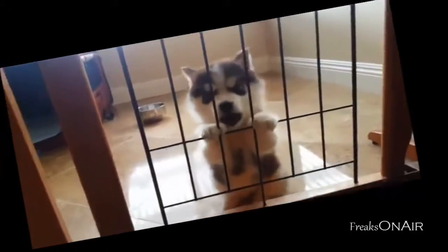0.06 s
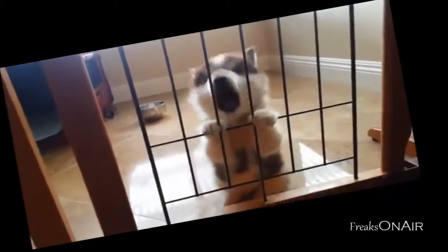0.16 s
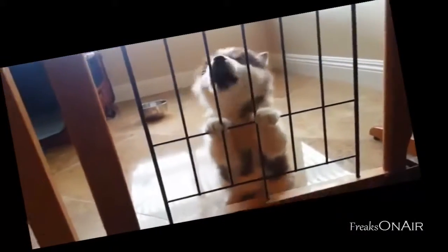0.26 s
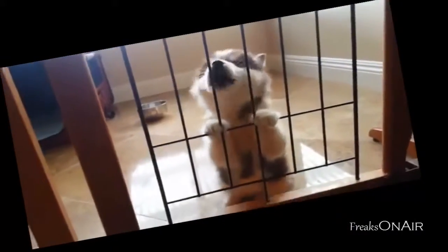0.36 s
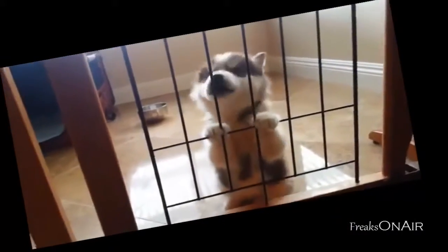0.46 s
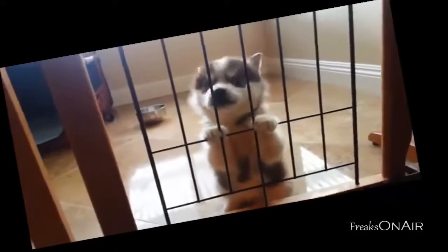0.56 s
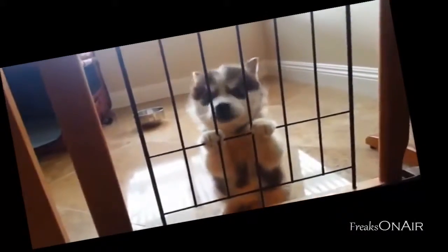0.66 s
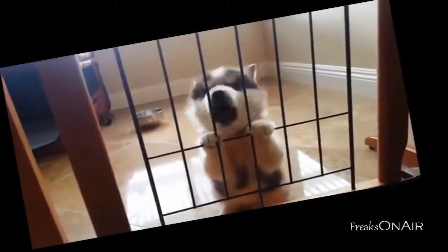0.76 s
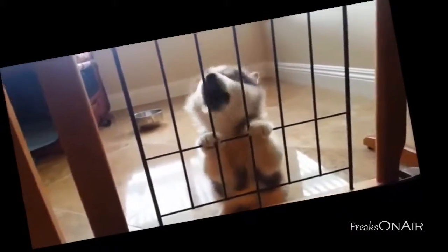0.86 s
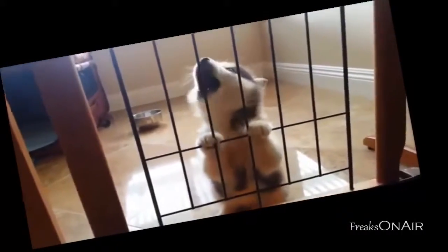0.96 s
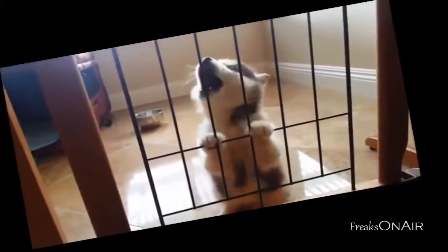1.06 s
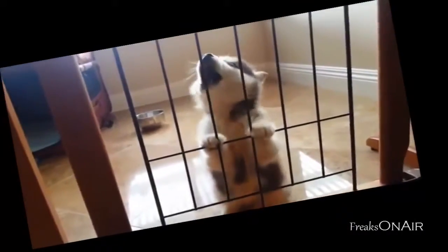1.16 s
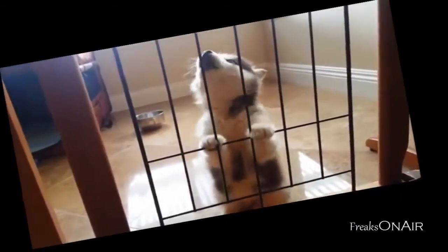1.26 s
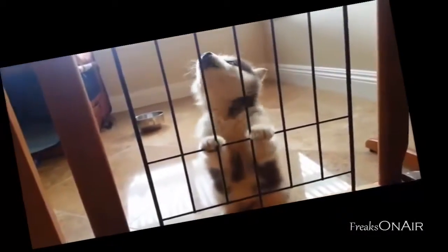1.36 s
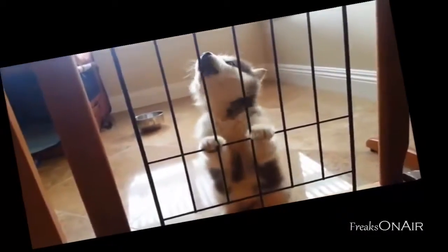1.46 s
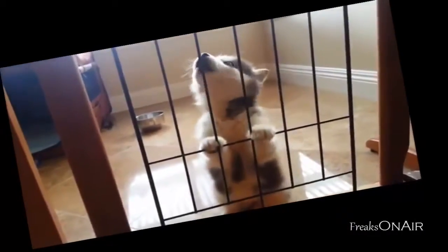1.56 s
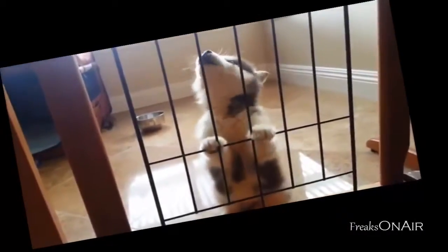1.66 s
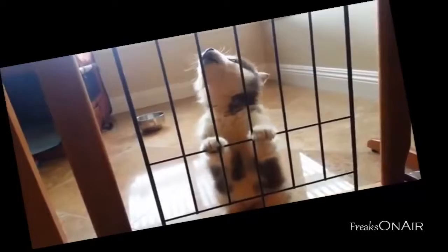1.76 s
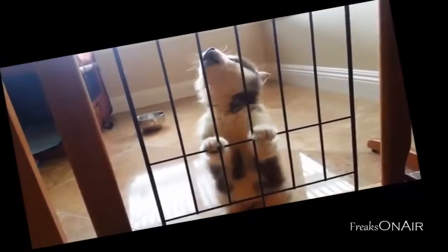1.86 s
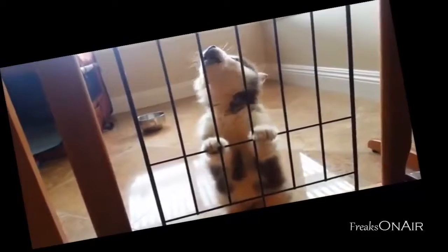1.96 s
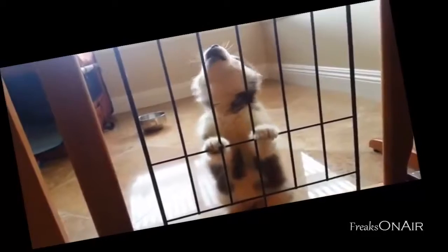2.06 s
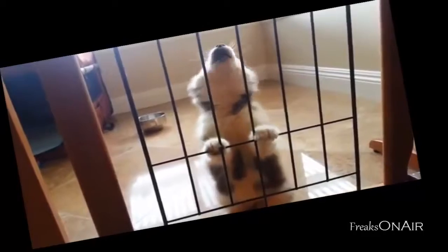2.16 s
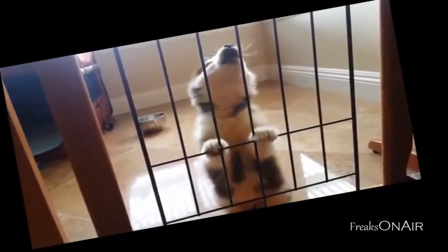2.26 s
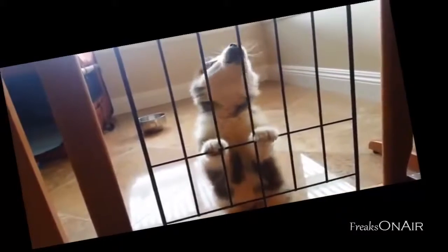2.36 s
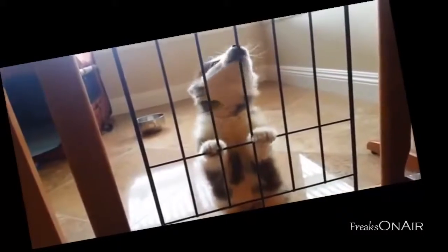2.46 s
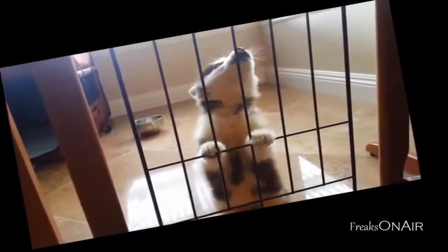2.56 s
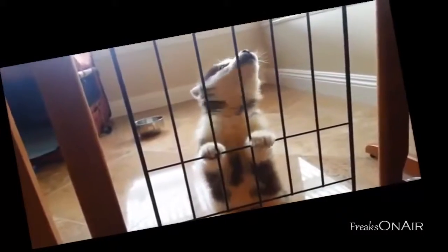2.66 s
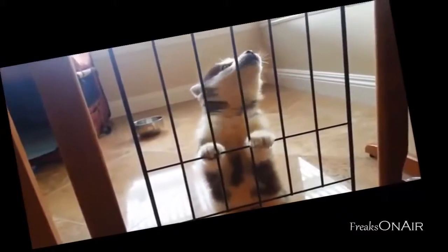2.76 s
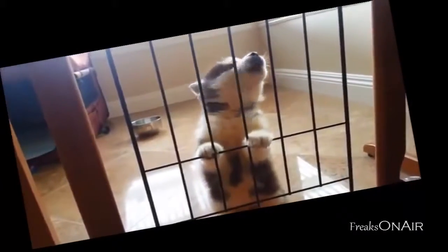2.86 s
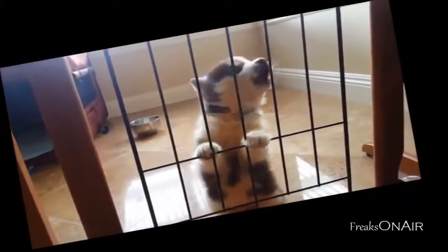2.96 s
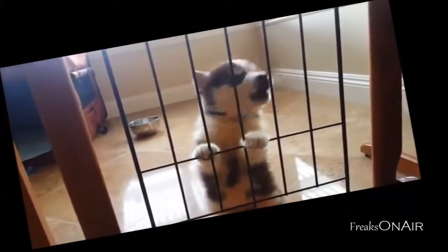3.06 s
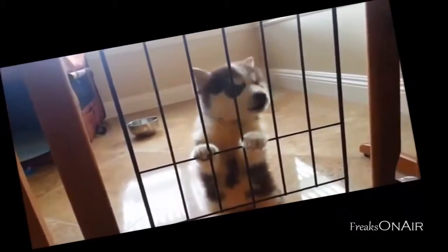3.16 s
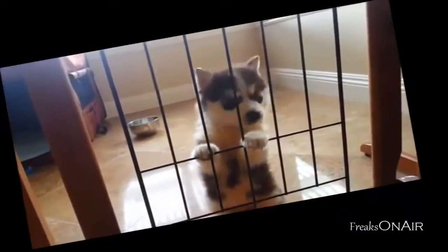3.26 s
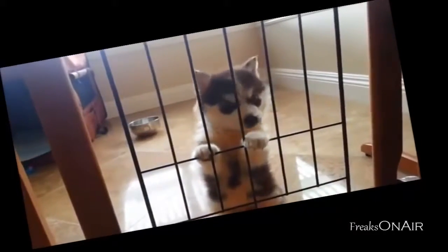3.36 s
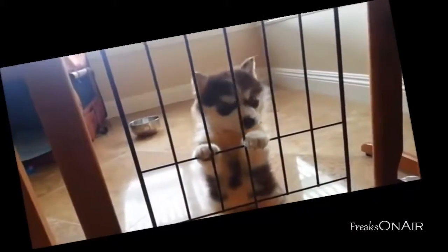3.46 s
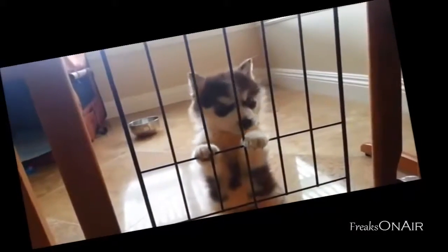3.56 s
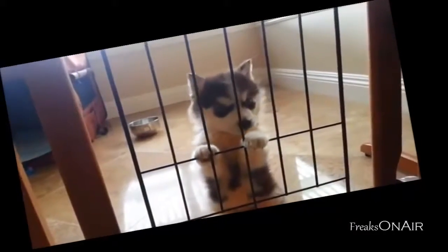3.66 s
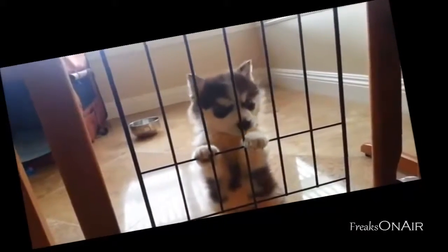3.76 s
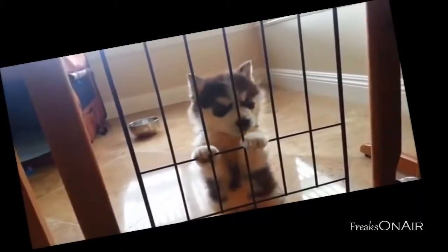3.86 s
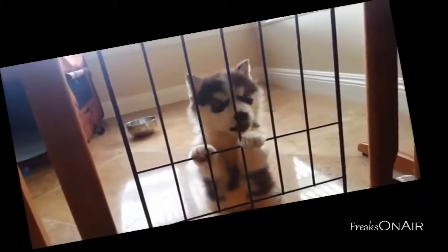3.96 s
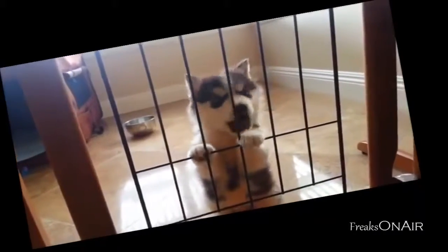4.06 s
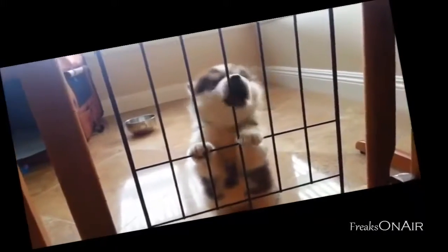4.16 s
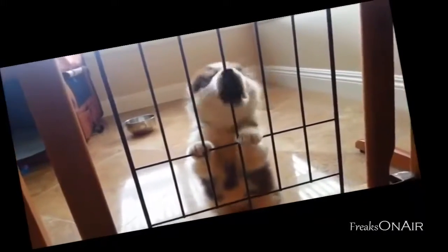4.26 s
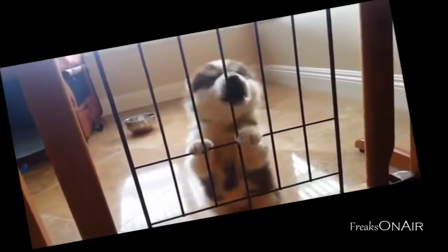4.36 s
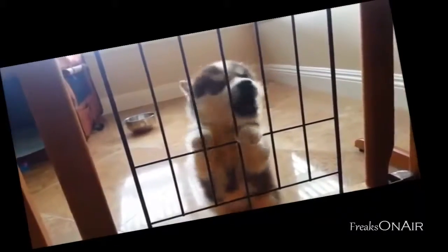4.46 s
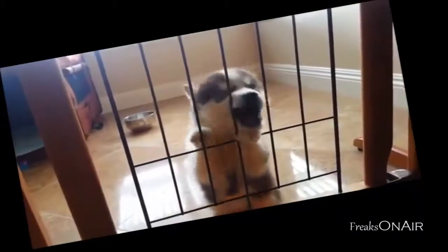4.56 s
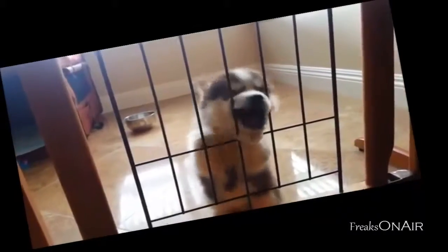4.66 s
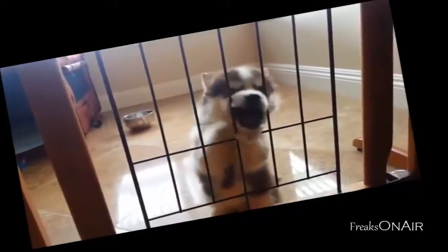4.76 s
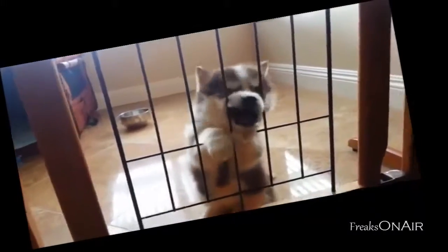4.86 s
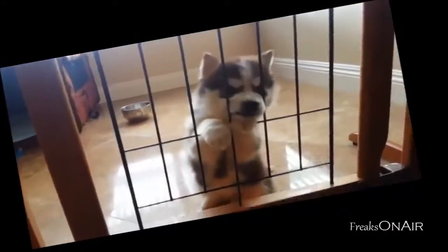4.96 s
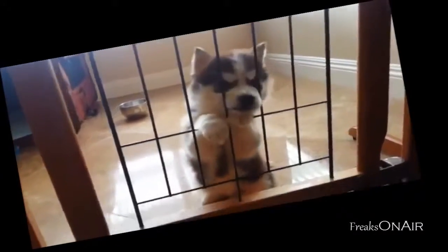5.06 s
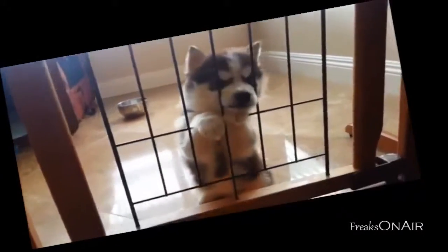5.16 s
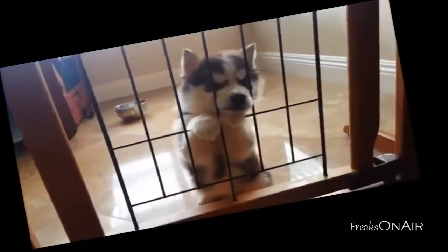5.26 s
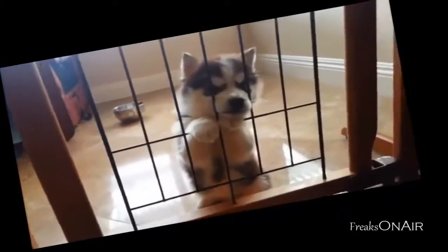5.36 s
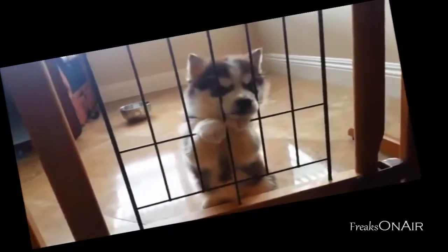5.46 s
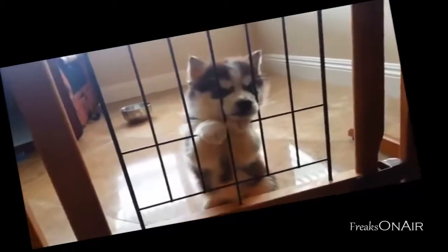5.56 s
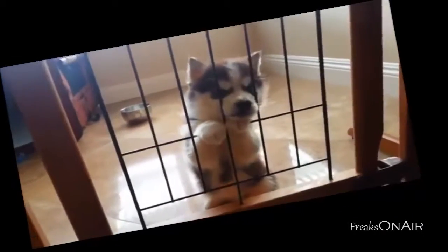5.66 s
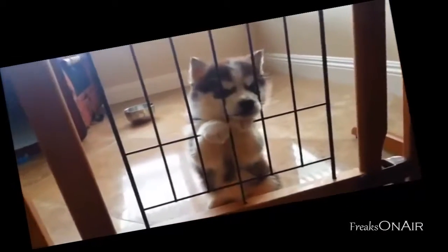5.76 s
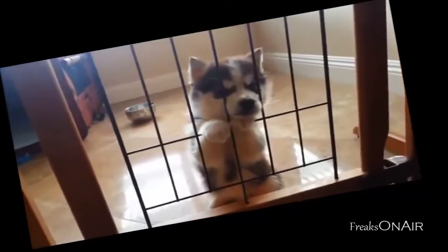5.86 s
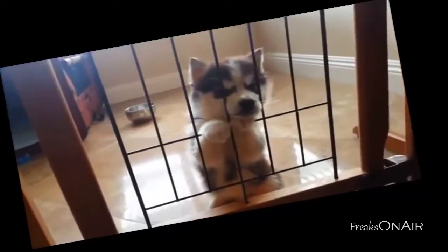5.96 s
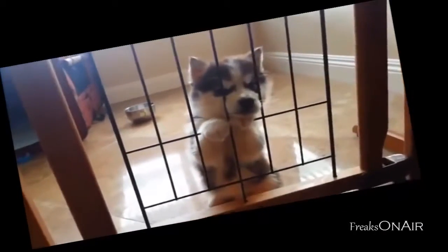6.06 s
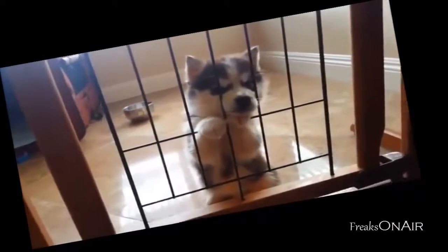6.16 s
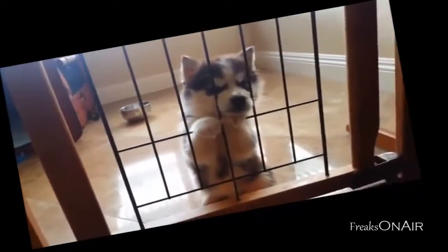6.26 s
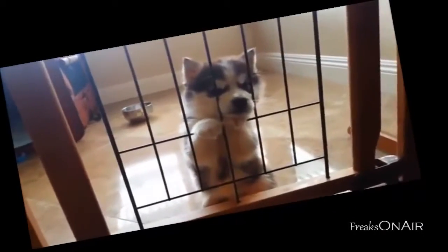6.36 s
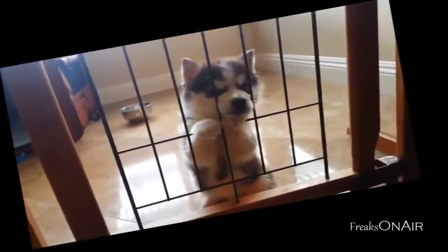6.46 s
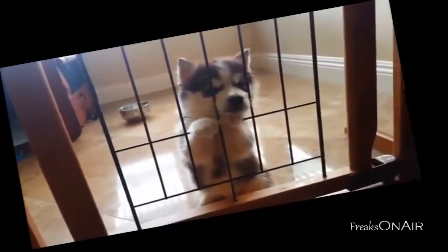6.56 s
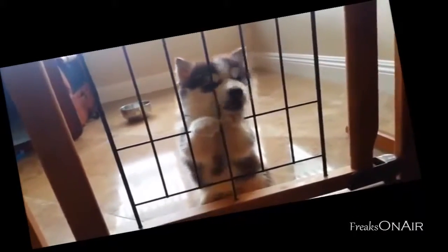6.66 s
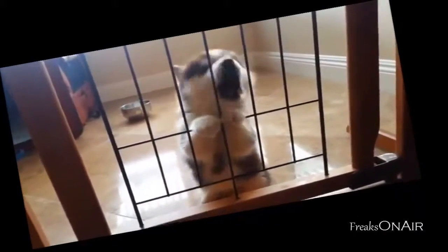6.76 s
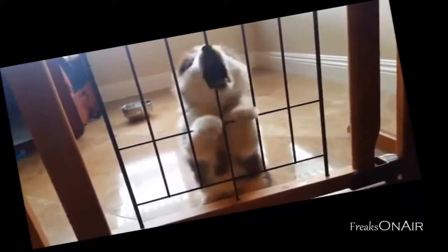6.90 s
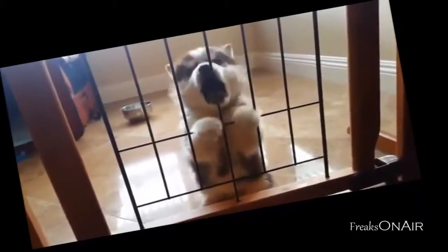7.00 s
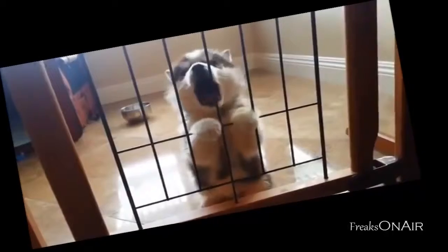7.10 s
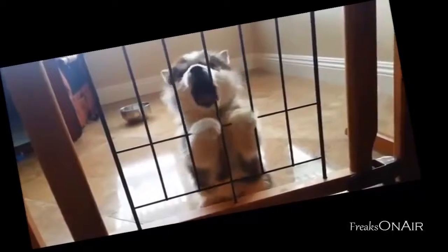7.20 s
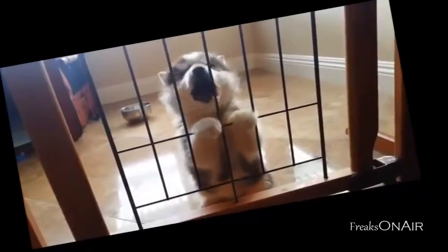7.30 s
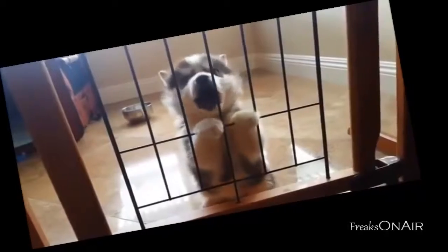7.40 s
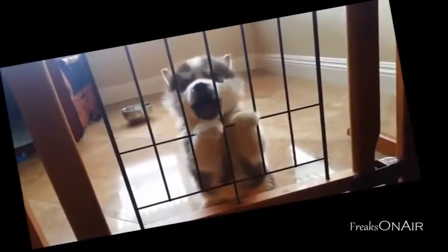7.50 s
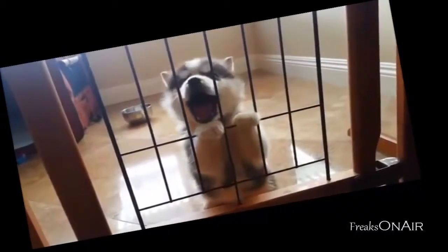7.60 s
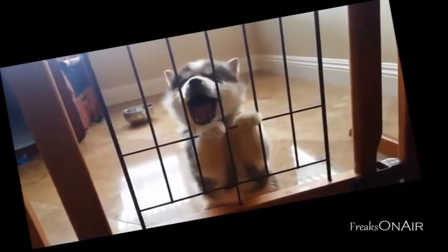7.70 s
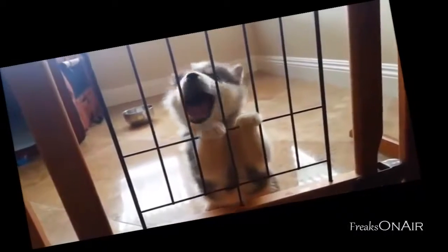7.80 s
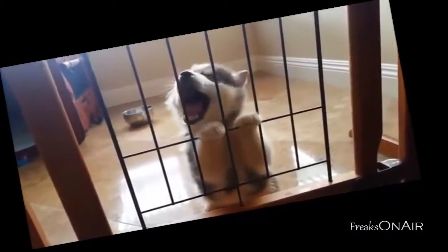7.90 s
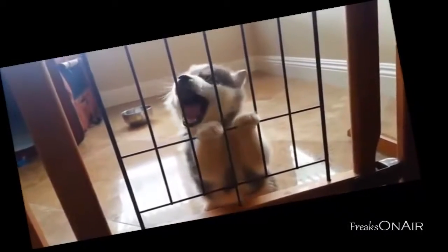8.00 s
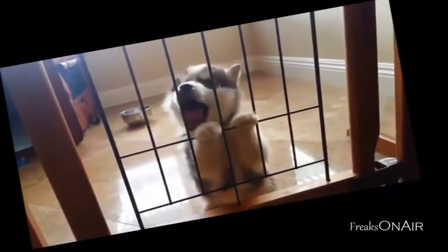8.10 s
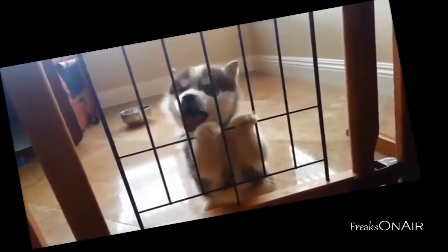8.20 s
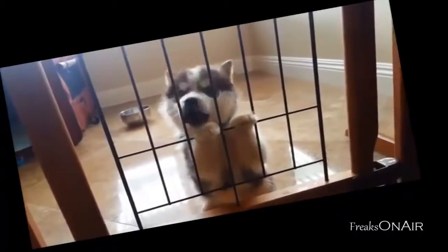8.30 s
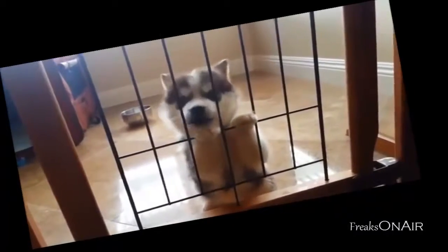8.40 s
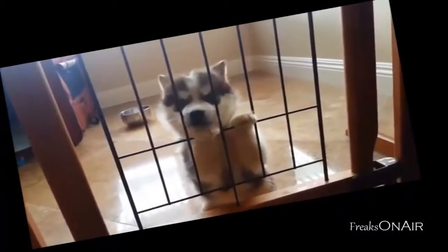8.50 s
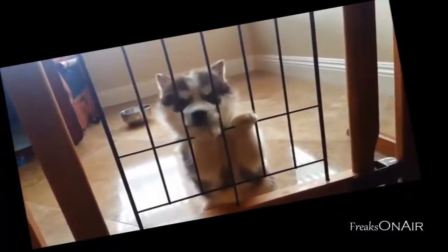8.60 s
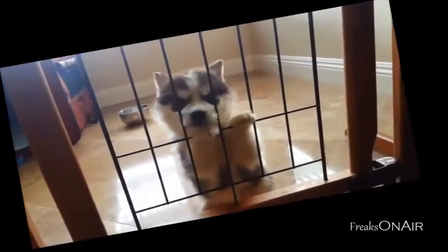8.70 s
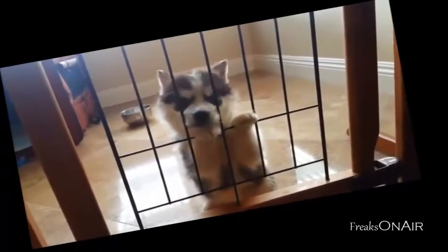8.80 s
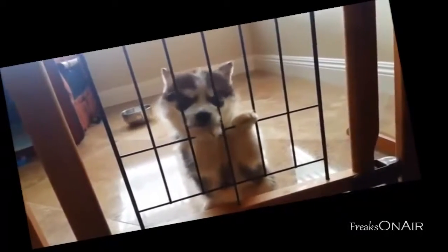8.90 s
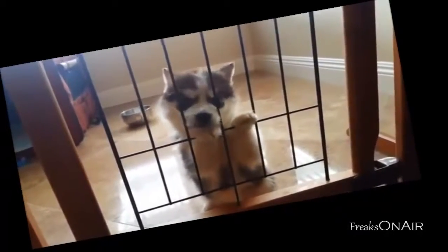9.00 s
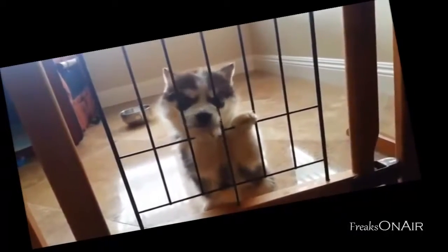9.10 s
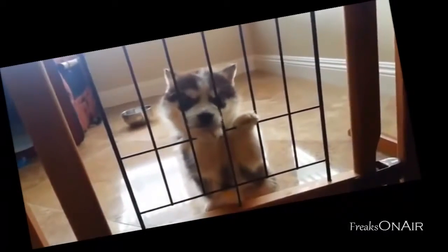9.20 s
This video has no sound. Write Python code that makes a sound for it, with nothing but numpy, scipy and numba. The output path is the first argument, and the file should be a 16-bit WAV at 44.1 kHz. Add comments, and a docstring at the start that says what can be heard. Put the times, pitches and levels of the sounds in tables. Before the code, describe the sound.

A husky puppy lets out several high, raspy yelps, then holds a softer, steady howl. It sniffs, breaks into another bout of yelps and scuffs faintly with its paws. After a pause its cries climb to shrieks and a whistling squeal, ending in a growly, nasal moan. The hard-floored room rings briefly over a faint low rumble, and the voice sits toward the right.

```python
"""A husky puppy yelps at a gate in a hard-floored room that rings briefly over a low rumble.
Its vocal folds make pulses that glide, break and rasp; its jaw and throat shape them into cries.
After two seconds it holds a soft howl, then sniffs and paws before and after another bout of yelps.
From seven seconds on it rises to shrieks and a whistling squeal, and ends in a growly, nasal moan."""
import sys
import numpy as np
from scipy import signal
from scipy.fft import rfft, irfft, next_fast_len
from scipy.io import wavfile
from scipy.ndimage import uniform_filter1d, map_coordinates
from numba import njit

SR = 44100
rng = np.random.default_rng(int(sys.argv[2]) if len(sys.argv) > 2 else 0)


def file_out(sig):
    """Save sig as 16-bit WAV at sys.argv[1]."""
    # one column per channel
    cols = np.atleast_2d(sig).T
    # limit, then scale
    lim = np.clip(cols, -1, 1)
    pcm = np.round(lim * 32767).astype(np.int16)
    wavfile.write(sys.argv[1], SR, pcm)


N = 407471
T = np.arange(N) / SR


def undb(db):
    """Turn decibels into a factor to multiply by."""
    return 10 ** (np.asarray(db) / 20)


def curves(rows):
    """Join each column's values with straight lines; the first column is the time."""
    times, *columns = np.transpose(rows)
    return [np.interp(T, times, column) for column in columns]


def during(spans, size=900):
    """1 inside the time spans, 0 outside, with edges softened over size samples."""
    return uniform_filter1d(sum(1. * ((T > start) & (T < end)) for start, end in spans), size=size)


def on_log_axis(hz, points):
    """Read between (Hz, value) points, giving each octave equal room."""
    point_hz, value = np.transpose(points)
    return np.interp(np.log(hz + 1), np.log(point_hz), value)


def colour(x, points):
    """Turn frequencies up or down along a curve of (Hz, dB) points."""
    size = next_fast_len(N + 4096)
    hz = np.arange(size // 2 + 1) * SR / size
    return irfft(rfft(x, size) * undb(on_log_axis(hz, points)), size)[..., :N]


def steady(x, size=500):
    """Even out a sound so that its level stays near 1."""
    return x / np.sqrt(np.abs(uniform_filter1d(x ** 2, size)) + 1e-12)


def wander(rate):
    """A random drift, roughly 1 either way, that turns rate times a second."""
    return map_coordinates(rng.standard_normal(N // 4), [T * rate], order=1)


@njit
def resonate(x, hz, width):
    """A resonance: a filter that lets through the sound near hz and weakens the rest."""
    y, mid, low = np.empty(len(x)), 0., 0.
    for i in range(len(x)):
        tuning, damping = np.tan(np.pi * hz[i] / SR), width[i] / hz[i]
        swing = (mid + tuning * (x[i] - low)) / (1 + tuning * (tuning + damping))
        mid, low, y[i] = 2 * swing - mid, low + 2 * tuning * swing, damping * swing
    return y


def band(x, hz, width_hz):
    """One resonance, still or moving."""
    return resonate(x, np.clip(hz, 50, SR / 3) + np.zeros(N), width_hz + np.zeros(N))


def ring(x, hz, width_hz):
    """A steeper resonance at an even level."""
    return steady(band(band(x, hz, width_hz), hz, width_hz))


def cry(start, end, first_hz, last_hz, db, treble_db, swell_db,
        held_s, fade_s, fade_db, last_jaw_hz, bark_db, pursed):
    """Plan one cry: a bark scoops up into a chain of yips, then fades."""
    # Each row: time in seconds, top pitch in Hz, sag after it in Hz,
    # share of the pitch lost when the voice breaks, rasp from 0 to 1.
    yips = [ (-.01, 865.5, 55, 0.018, 0.1), (0.131, 774.8, 15.5, 0, 0), (.43, 1174, 246, 0.022, .25),
            (.615, 883.8, 49.5, 0.0067, 0), (1.012, 1212, 225, .17, .17), (1.192, 1011, 110.5, 0, .3),
            (1.29, 884.1, 0, 0.023, 0), (1.38, 1047, -50, 0.0045, 0.1), (1.695, 927, 170, 0.024, 0.3),
            (2.135, 657.5, -1.5, 0.012, 0.3), (4.083, 810.4, -1.5, 0.019, .3), (4.39, 1012, 180.5, .3, 0.4),
            (4.545, 1104, 199, .27, .35), (4.722, 1122, 189.5, 0.0082, 0), (4.871, 1069, 144.5, 0, 0),
            (5.0, 1079, 108.5, 0.04, .08), (5.135, 912.8, -1, 0, 0), (5.18, 757, 5.5, 0.024, 0.23),
            (7.0, 1239, 380.5, .38, 0.3), (7.144, 1189, 60, 0.014, 0.2), (7.22, 1150, 161.5, .16, 0.4),
            (7.318, 1066, 79, 0.035, .3), (7.41, 1059, 0.5, 0.0075, .05), (7.523, 1185, 145.5, 0, .1),
            (7.683, 1839, 132.5, .22, .15), (7.815, 1748, -97, 0.038, .15), (7.9, 1634, 54.5, 0.026, 0.2),
            (8.06, 1646, 85.5, 0.0066, 0.23), (8.53, 600.8, -43.5, 0, 0.3)]
    t = np.arange(start, end - .002, .004)
    at, top_hz, sag_hz, drop, hoarse = np.transpose([yip for yip in yips if start < yip[0] < end])
    index, progress = np.divmod(np.interp(t, [*at, end], np.arange(len(at) + 1)), 1)
    yip = index.astype(int)
    scoop = np.clip((t - start) / (at[0] - start), 0, 1) ** 1.6
    # Late in a yip the pitch may break down into the low, hard chest voice.
    broken = drop[yip] * (progress > .54) * (progress < .92)
    hz = np.interp(t, [*at, end], [*top_hz, last_hz]) - sag_hz[yip] * np.sin(np.pi * progress) ** 1.15
    hz = hz * (1 - broken) * (first_hz / top_hz[0]) ** (1 - scoop)
    chest = uniform_filter1d(1. * ((t < at[0]) | (broken > .1)), size=5)
    chest *= np.clip((1015 - hz) / 200, 0, 1)
    rasp = (1 - chest) * uniform_filter1d(hoarse[yip], size=7) + .29 * chest
    faded = 1 - np.exp(-np.maximum(t - held_s, 0) / fade_s)
    weak_db = fade_db * faded + swell_db * (1 - scoop)
    squeal_db = 18 * np.exp(-((hz - 1839) / 67) ** 2)  # the pitch meets the mouth's resonance
    level_db = db - weak_db - 6.5 * rasp - 4 * chest + squeal_db
    bright_db = treble_db - 1.18 * weak_db - .5 * chest - level_db
    open_jaw_hz = np.minimum(927 + 1.16 * hz - 130 * chest, 2095)
    jaw_hz = (1 - faded) * open_jaw_hz + faded * last_jaw_hz
    lips = np.full(len(t), np.clip(pursed, 0, 1))
    return np.column_stack([t, hz, rasp, level_db, jaw_hz, bright_db, chest, bark_db - .5 * weak_db, lips])


def calls():
    """Plans for all cries and held notes in order of time, with the columns that puppy() names."""
    # Each row: start and end in seconds, first and last pitch in Hz, level, treble and opening swell
    # in dB, fade start and fade time in seconds, fade depth in dB, jaw resonance after the fade in Hz,
    # bark level in dB, lip pursing from 0 to 1.
    cries = [ (-.1, 0.17, 420, 1002, -26.5, -29.5, -13, 0.13, 0.03, 8.5, 1460, -36, 0),
             (0.344, 0.799, 440, 583.3, -21, -31.5, 2, 0.62, 0.048, 19.5, 795, -30, 0),
             (0.933, 1.47, 390, 600, -22, -32, -4, 1.383, 0.039, 13.5, 1240, -29.5, 0.08),
             (1.616, 1.945, 410, 397.4, -16.5, -25.5, 5, 1.705, 0.035, 28, 978.7, -25.5, 0.8),
             (2.067, 2.148, 410, 694.7, -20, -43.5, 3.5, 2.34, 0.069, 4.5, 1190, -39.5, 0.9),
             (4.071, 4.12, 790, 794.4, -30.5, -69, -3, 4.1, 0.0037, 15.5, 807, -55, 0.7),
             (4.291, 5.312, 380, 778.6, -21, -27.5, 0, 5.132, 0.04, 15.5, 725, -30.5, 0.21),
             (6.901, 7.672, 468, 1229, -22.5, -27.5, -2, 7.35, 0.085, 1, 1820, -35, 0.05),
             (7.674, 8.277, 1500, 1646, -31.5, -25.5, -13, 8.145, 0.14, 16, 1700, -42, 0.01),
             (8.436, 8.664, 368, 495, -24, -32, 4, 8.6, 0.073, 28.5, 1220, -32, 0)]
    # Each row of both: time in seconds, pitch in Hz, level and treble in dB, jaw resonance in Hz.
    howl = [(2.28, 565.5, -29.5, -52, 1196), (2.41, 580, -24.5, -48, 1373), (2.57, 564, -18, -48.5, 1207),
            (2.62, 555.7, -27.5, -47, 1260), (2.736, 526.5, -26, -51, 1122), (2.96, 531, -32, -43.5, 1210),
            (3.02, 526, -29, -45, 1320), (3.045, 529.7, -22.5, -43, 1240), (3.08, 527.7, -27, -48.5, 1480),
            (3.288, 548, -35, -36.5, 1533), (3.39, 553.4, -42.5, -41.5, 1213), (3.445, 592, -37, -54, 776),
            (3.475, 594, -41, -54, 764), (3.5, 815, -43, -52, 770)]
    moan = [(8.67, 516, -31, -56, 795), (8.698, 486.4, -38.5, -48, 700), (8.796, 504, -38, -48, 606),
            (8.956, 569.1, -45, -50, 664), (8.99, 605, -36.5, -47.5, 595), (9.19, 619, -36.5, -48, 642),
            (9.24, 590, -39, -49, 640)]
    plans = [cry(*row) for row in cries]
    plans.append(held_note(howl, rasp=.0095, gain_db=-2.5, bright_db=-.5))
    plans.append(held_note(moan, rasp=.22, gain_db=-3.5, bright_db=1))
    return sorted(plans, key=lambda plan: plan[0, 0])


def voicing(plans, attack_s=.02, release_s=.011):
    """1 while the vocal folds vibrate, 0 between cries."""
    gates = (np.clip((T - plan[0, 0]) / attack_s + .061, 0, 1)
             * np.clip((plan[-1, 0] - T) / release_s + 1, 0, 1) for plan in plans)
    return np.minimum(sum(gates), 1)


def vocal_folds(hz, alternation, rasp, crack, flutter_hz=285.5, tear_hz=540):
    """Sharp pulses and their phase. A second vibration shakes them in a rasp, a faster one in a crack."""
    quaver = .011 * np.clip(hz / 500 - 1, .2, 1) * wander(48)
    jitter = (.002 + .018 * rasp) * wander(110) + .015 * rasp * wander(600) + .028 * crack * wander(170)
    flutter = rasp * np.sin(2 * np.pi * np.cumsum(flutter_hz * (1 + .12 * wander(45))) / SR)
    tear = crack * np.sin(2 * np.pi * np.cumsum(tear_hz * (1 + .15 * wander(120))) / SR)
    phase = 2 * np.pi * np.cumsum(hz * (1 + quaver + jitter)) / SR + .27 * flutter + .42 * tear
    # Harmonics are multiples of the pitch; the odd ones are weaker here.
    pulses = sum(np.cos(k * phase) * undb(-3 * (k % 2)) * np.clip((SR / 3 - k * hz) / hz, 0, 1)
                 for k in range(1, 25))
    pulses *= 1 + alternation * np.cos(phase / 2)  # uneven pulses add a tone an octave below
    pulses = steady(pulses * (1 + .4 * flutter + .72 * rasp * wander(350)))
    breath = rng.standard_normal(N) * (1 + np.cos(phase))
    return pulses + .09 * rasp * breath, phase


def throat(source, opening):
    """The throat colours the pulses, blending an open mouth with pursed lips."""
    # Each row of both: frequency in Hz, gain in dB.
    open_mouth = [(350, -9), (750, 2.5), (1900, 3.5), (3600, -4), (7200, -5), (8200, 1), (10500, -10.5)]
    pursed_lips = [(300, -3), (500, 10.5), (1100, 4), (1650, 3.5), (2200, -9), (3200, -17), (4300, -31.5),
                   (6000, -6), (7700, -5), (10000, -24)]
    return opening * colour(source, open_mouth) + (1 - opening) * colour(source, pursed_lips)


def strain(source):
    """A second mouth resonance opens in strained cries."""
    # Each row: start and end in seconds, frequency in Hz, level against the vowel in dB.
    strains = [(-.1, 0.155, 2300, -5.5), (4.701, 5.136, 3936, -9.5)]
    return sum(during([(start, end)]) * undb(db) * ring(source, hz, 350) for start, end, hz, db in strains)


def tongue(x):
    """Four high resonances slide and swell as tongue and lips move."""
    return sum(band(x, hz * (1 + .11 * wander(17)), 600) * undb(13 * wander(30))
               for hz in np.linspace(4400, 8200, 4))


def bark(source, pursed):
    """The hard throat resonances of the chest voice, drifting a little."""
    # Each row: frequency and width in Hz, level in dB, loss through pursed lips in dB.
    rings = [(2944, 510, -0.5, 2.5), (4650, 1200, -0.5, 39.5), (6500, 1800, -2, 10.5)]
    return sum(ring(source, hz * (1 + .025 * wander(14)), width_hz) * undb(db - pursed * lost_db)
               for hz, width_hz, db, lost_db in rings)


def puppy():
    """The voice in two parts: the round vowel with its rings, and the bright treble edge."""
    # Each row of all three: start and end in seconds.
    cracks = [(.416, 0.46), (1.0, 1.05), (1.18, 1.22), (1.218, 1.26), (4.37, 4.48), (4.6, 4.68),
              (7.09, 7.125), (7.19, 7.236), (7.298, 7.38), (7.348, 7.35)]  # the folds lose their beat and turn hoarse
    growls = [(8.542, 8.63), (8.977, 9.3)]  # the voice gains a tone an octave below
    nasal = [(8.6, 9.3)]  # the voice goes through the nose
    plans = calls()
    hz, rasp, level_db, jaw_hz, bright_db, chest, bark_db, pursed = curves(np.vstack(plans))
    crack, growl, nose, gate = during(cracks, size=200), during(growls), during(nasal), voicing(plans)
    rasp = np.clip(rasp, .4 * crack, 1)
    source, phase = vocal_folds(hz, rasp ** 2 + .5 * growl, rasp, crack)
    # High or harsh cries open the mouth; soft, low ones pass through pursed lips.
    opening = np.clip(np.maximum(hz - 620, 0) / 300 + chest * (1 - pursed) + .16 * growl, 0, 1)
    voice = throat(source, opening)
    # The jaw resonance is a sharp peak on a broad one.
    vowel = steady(band(band(voice, jaw_hz, 450 * (1 + crack)), jaw_hz, 1900)) * undb(-5 * crack)
    vowel += strain(source) + shriek(source, phase, hz) + undb(-9.5) * nose * ring(source, 2000, 249)
    treble = signal.sosfilt(signal.butter(6, 3000, "high", fs=SR, output="sos"), voice)
    squeal = undb(10) * np.clip((hz - 1250) / 300, 0, 1) * whistle(phase)
    buzz = undb(3) * nose * ring(source + .5 * rng.standard_normal(N), 6500, 3860)
    edge = steady(steady(.5 * treble + tongue(treble)) + squeal + buzz) * undb(bright_db - 6)
    edge *= undb(opening * (3.5 * wander(75) - 1))  # ragged from an open mouth
    # Hoarse stretches stutter, and the folds falter where the pitch jumps.
    stutter_db = (1 + 3.63 * rasp) * wander(60)
    slide = uniform_filter1d(np.abs(np.gradient(np.log(hz))) * SR, size=200)
    effort = undb(level_db - .5 + stutter_db) * gate / (1 + (slide / 45) ** 2)
    return vowel * effort + bark(source, pursed) * chest * undb(bark_db) * gate, edge * effort


def room(x, wet_db, early_db, early_s=.0042):
    """Quick echoes from floor and walls, then a smooth tail; both differ at each microphone."""
    # Each row: frequency in Hz, seconds to fade by 60 dB.
    fade_times = [(1500, 0.52), (9000, 0.35)]
    hz, seconds, grains = signal.stft(rng.standard_normal((2, SR)), SR)
    fade = undb(-60 * seconds / on_log_axis(hz, fade_times)[:, None])
    tail = signal.istft(grains * fade, SR)[1][:, :SR]
    early = rng.standard_normal((2, SR)) * T[:SR] * np.exp(-2 * T[:SR] / early_s)
    echoes = sum(undb(db) * part / np.sqrt(np.sum(part ** 2) / 2)
                 for part, db in ((tail, wet_db), (early, early_db)))
    return x + signal.fftconvolve(x[None], echoes, axes=1)[:, :N]


def rumble():
    """A low, uneven background noise, nearly the same on both sides."""
    # Each row: frequency in Hz, gain in dB.
    tone = [(30, -31.5), (105, -11), (135, 1), (260, -11.5), (550, -19.5), (1000, -28), (10000, -35)]
    # Each row: time in seconds, level in dB.
    levels = [(0, -59), (3.4, -55.5), (3.8, -75.5), (4.1, -54.5), (4.6, -74.5), (5.3, -53), (6, -69),
              (7.2, -70), (8.3, -56.5)]
    mid, side = colour(rng.standard_normal((2, N)), tone)
    level_db, = curves(levels)
    stereo = (mid + undb(-11) * side * np.array([[1], [-1]])) / mid.std()
    return stereo * undb(level_db + 1.8 * wander(11))


def held_note(note, rasp, gain_db, bright_db):
    """Plan a long howl or moan through pursed lips, in the same columns as a cry."""
    return np.array([(s, hz, rasp, db + gain_db, jaw_hz, treble_db - db + bright_db, 0, db, 1)
                     for s, hz, db, treble_db, jaw_hz in note])


def sniffs_and_scuffs():
    """Short swells of hiss from nose and paws."""
    # Each row: start and length in seconds, centre and width in Hz, level in dB.
    rustles = [(3.424, 0.14, 7980, 2560, -54), (4.04, 0.064, 7600, 4994, -64),
               (5.401, 0.2, 6700, 6800, -58), (5.683, 0.034, 2500, 5145, -64)]
    out = np.zeros(N)
    for start, length, hz, width_hz, db in rustles:
        hiss = band(band(rng.standard_normal(N), hz, width_hz), hz, width_hz)
        out += hiss / hiss.std() * undb(db) * np.sin(np.pi * np.clip((T - start) / length, 0, 1))
    return out


def shriek(source, phase, hz):
    """A pressed voice gains a piercing ring and, below 1400 Hz, a firm tone at its own pitch."""
    # Each row: start and end in seconds.
    shrieks = [(7.4, 7.67), (7.755, 8.3)]
    firm_tone = undb(-7) * np.sin(phase) * np.clip((1400 - hz) / 200, 0, 1)
    return during(shrieks) * (undb(-10.5) * ring(source, 3100, 692) + firm_tone)


def whistle(phase, whistle_hz=9850):
    """The thin whistle of the highest squeals, chopped by the folds, in a rush of air."""
    tone = np.cos(2 * np.pi * np.cumsum(whistle_hz + 70 * wander(25) + 70 * wander(700)) / SR)
    air = ring(rng.standard_normal(N), 9000, 4000)
    return steady(tone * (1 + 1.2 * np.cos(phase))) + undb(-6) * air


def scene():
    """Puppy and room, heard by two unlike microphones."""
    # The balance between left and right shifts over time. Each row: time in seconds, left minus right level in
    # dB.
    balance_shifts = [(1.4, -10), (2.4, -6), (3.1, -9.5), (4.3, -8), (8.4, -9.5)]
    # The left microphone dulls the highs. Each row: frequency in Hz, gain in dB.
    left_tone = [(3000, 4), (5800, 3), (7000, -6), (8200, -18)]
    vowel, edge = puppy()
    balance_db, = curves(balance_shifts)
    body = room(vowel, wet_db=-6.5, early_db=-6) * undb(np.array([balance_db, -balance_db]) / 2)
    # The treble beams up at the ceiling, so more of it arrives as echo.
    left, right = body + room(edge + sniffs_and_scuffs(), wet_db=3.5, early_db=7.5)
    return np.array([colour(left, left_tone), right]) + rumble()


def record(dry, top_hz=10800):
    """The recorder steeply cuts the highest sounds."""
    return signal.sosfilt(signal.ellip(10, .2, 80, top_hz, fs=SR, output="sos"), dry)


dry = scene()
out = record(dry)
file_out(out)
```